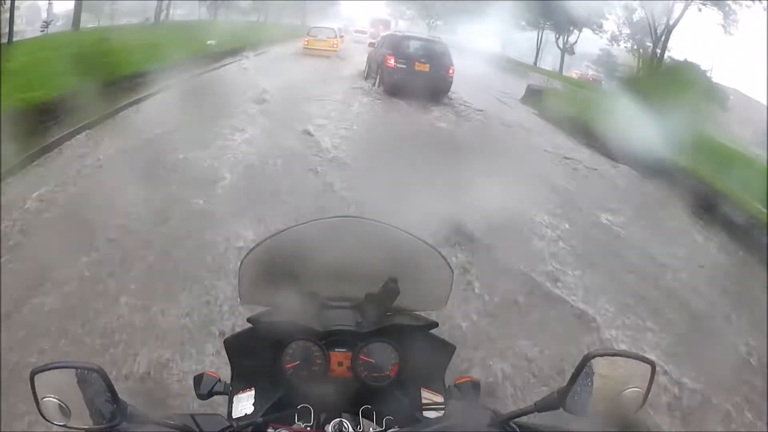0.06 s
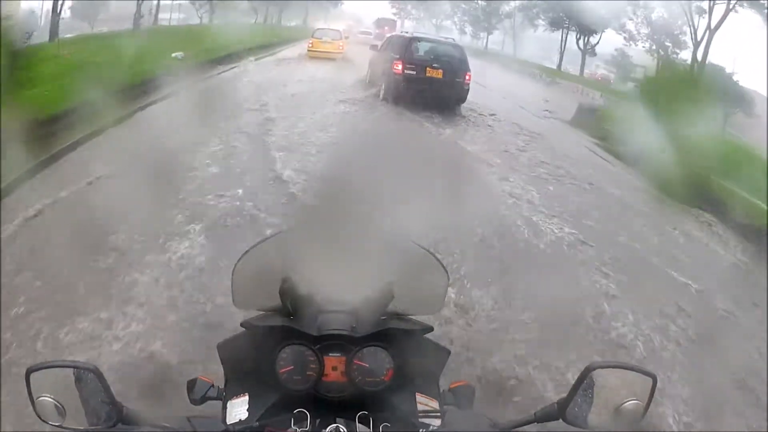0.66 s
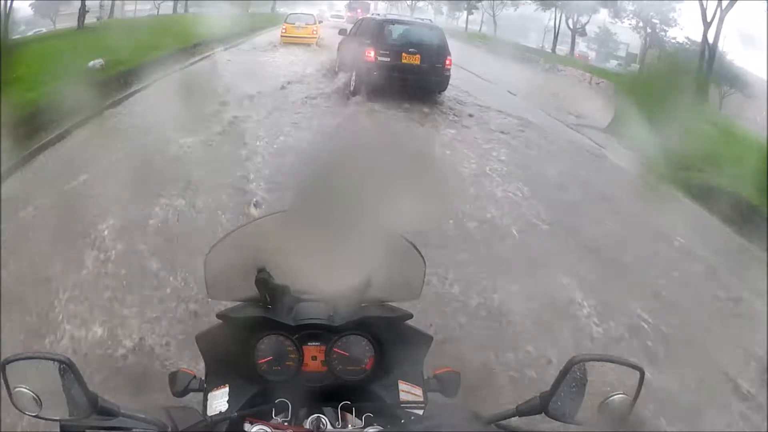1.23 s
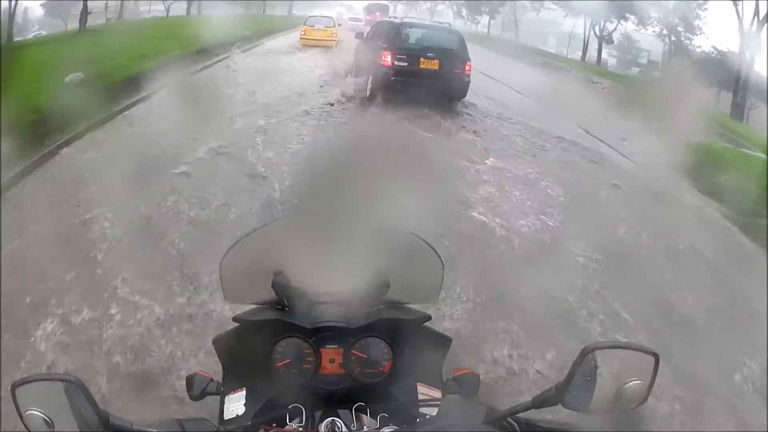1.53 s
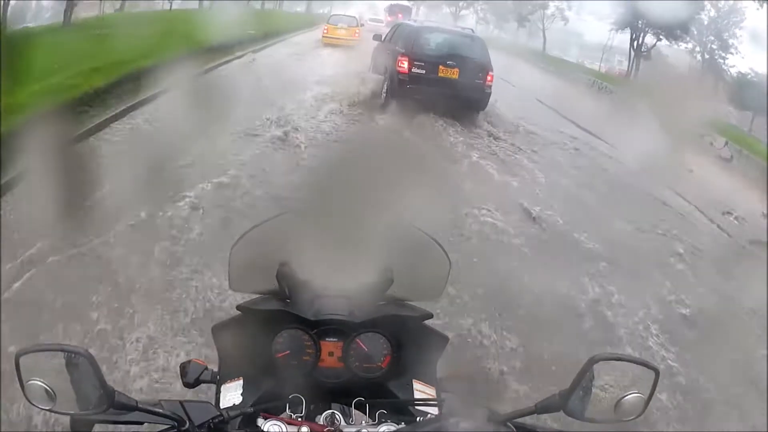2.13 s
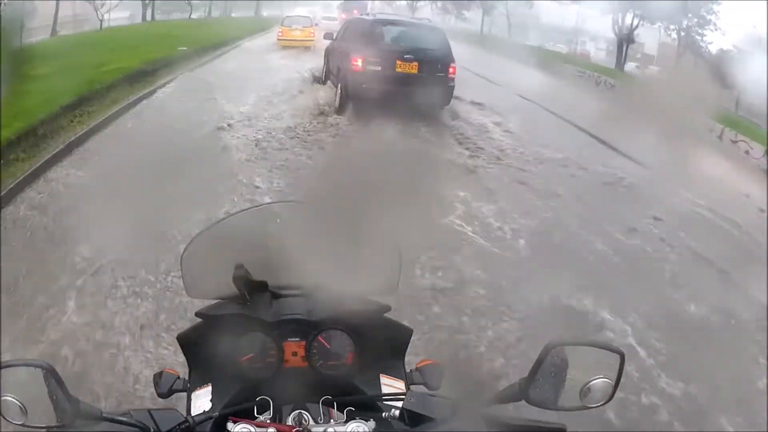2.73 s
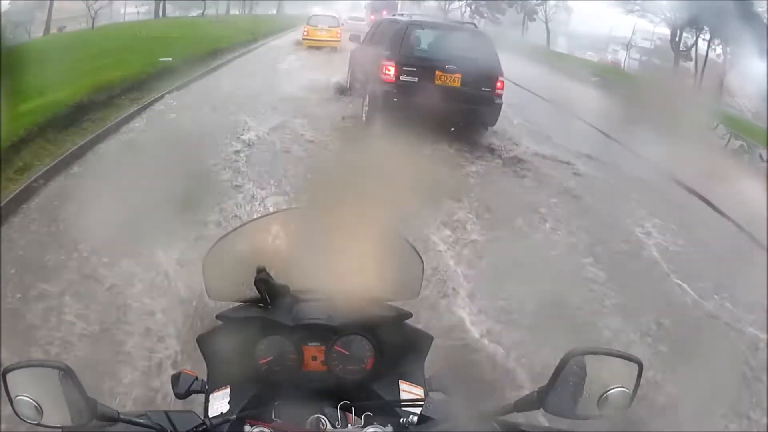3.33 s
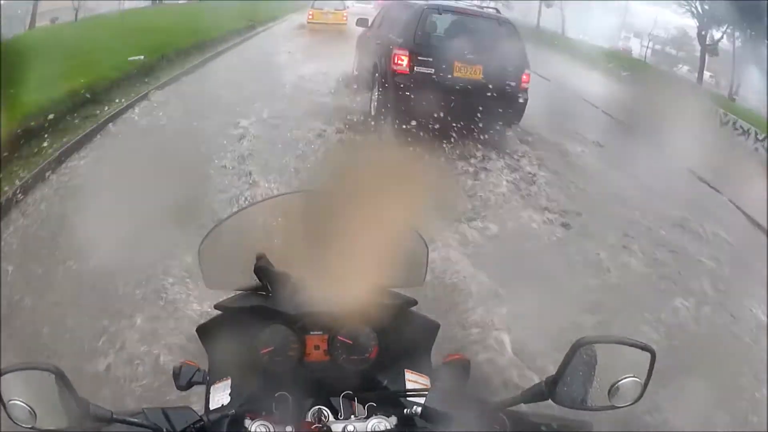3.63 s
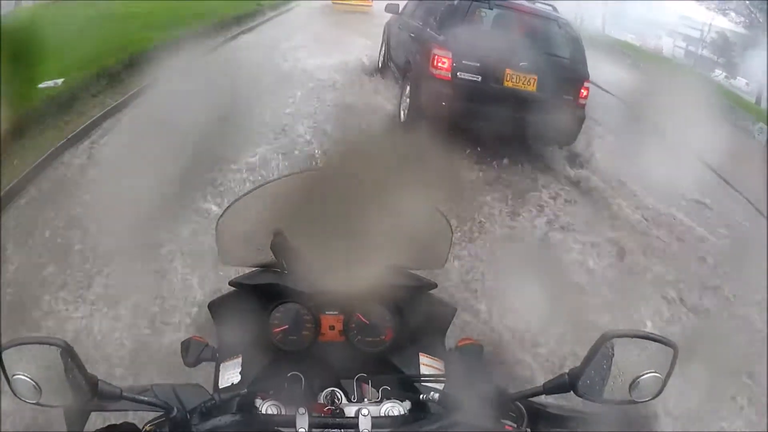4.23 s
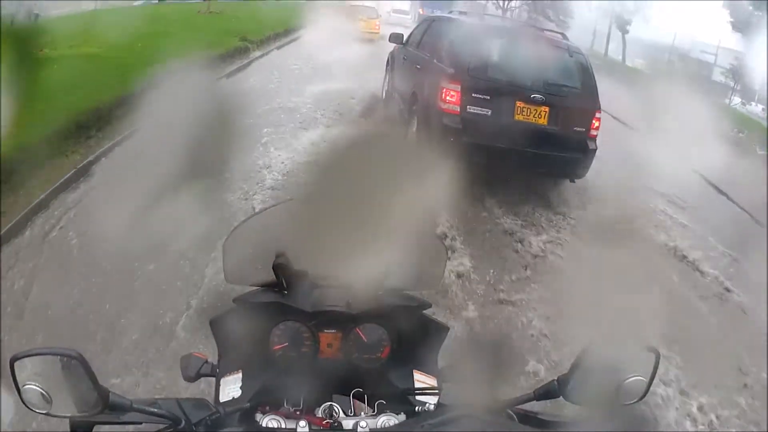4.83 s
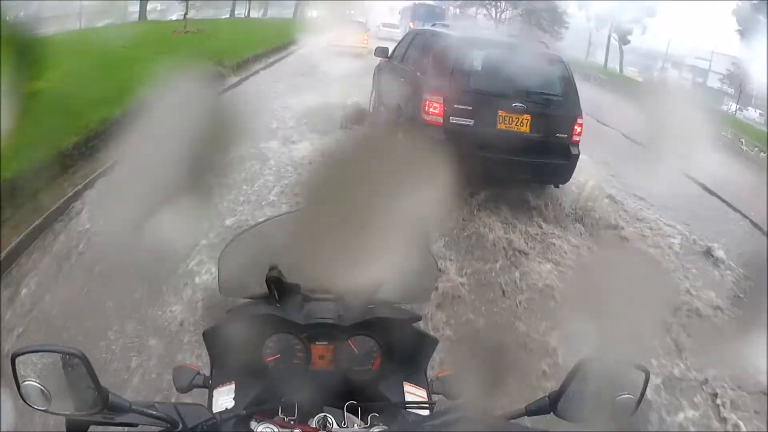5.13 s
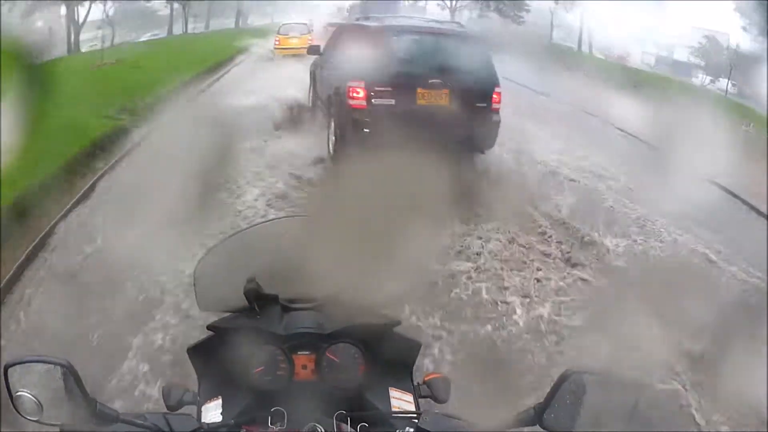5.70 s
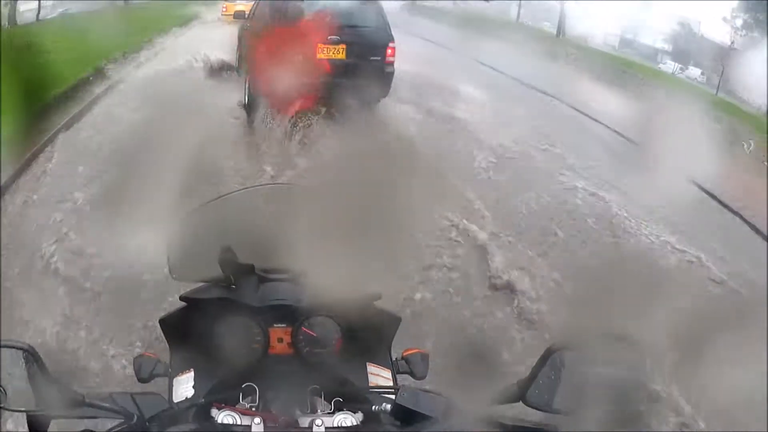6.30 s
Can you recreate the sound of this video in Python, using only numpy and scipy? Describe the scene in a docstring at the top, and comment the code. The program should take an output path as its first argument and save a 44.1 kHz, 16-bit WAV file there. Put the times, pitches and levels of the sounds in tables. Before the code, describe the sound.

Rain and road spray splatter against a moving motorcycle's microphone, with gusty wind rush and a faint engine drone underneath.

```python
"""Motorcycle ride in heavy rain

A rider on a flooded street wears a camera with two microphone holes, the left and right ports.
Wind buffets both, and the engine drones faintly underneath. Spray from the car ahead washes
and patters on the camera's housing, ever thicker. A drop that lands right on a port rings
the film of water there, and a big one overloads that side."""
import sys
import numpy as np
from scipy import signal
from scipy.fft import rfft, irfft
from scipy.io import wavfile

SR = 44100
rng = np.random.default_rng(int(sys.argv[2]) if len(sys.argv) > 2 else 0)


def bounce(signal):
    """Save signal as a 16-bit WAV file at the path given by the first command-line argument."""
    frames = np.transpose(np.atleast_2d(signal))
    limited = np.clip(frames, -1, 1)
    pcm = np.round(limited * 32767).astype(np.int16)
    wavfile.write(sys.argv[1], SR, pcm)


N = 280476
TIME = np.arange(N) / SR
RING_TIME = np.arange(4096) / SR  # seconds since a hit
LUMP_DB, LUMP_HZ = 1.6, 50.  # the spray lands in lumps: how strong, how fast

# Levels are relative. t60 is the time a ring takes to fade by 60 dB.
# rush of air at the ports: f/Hz, left/dB, right/dB
WIND_SPECTRUM = [(22, -107, -27), (56, -26.5, -33), (106, -18, -5.5), (119.7, -6.5, -7.5), (247, -2.5, -5),
                 (350, -3.5, -9), (503, -14.5, -5), (593, -13, -11), (680, -25.5, -15), (1260, -51, -44.5),
                 (2920, -68, -86.5), (9000, -100, -100)]
# strength of the airflow: t/s, left/dB, right/dB
GUST_LEVELS = [(0.0, -12.5, -17.5), (0.55, -15.5, -24.5), (0.799, -16, -24), (1.05, -13, -20.5),
               (1.38, -14.5, -24), (1.462, -15.5, -28), (1.581, -13, -24), (1.679, -21.5, -23.5),
               (2.02, -10, -22), (2.12, -15.5, -21.5), (2.22, -10.5, -24.5), (2.449, -19, -18.5),
               (2.661, -19, -24.5), (2.78, -10, -18.5), (2.88, -18.5, -14), (3.04, -10.5, -15),
               (3.261, -22.5, -14), (3.38, -23, -29), (3.459, -26.5, -16), (3.537, -32.5, -33),
               (3.719, -19.5, -16), (3.919, -13.5, -14.5), (4.099, -22.5, -27.5), (4.322, -13.5, -21),
               (4.78, -23, -26), (5.3, -15, -28), (5.841, -14, -21), (5.92, -15.5, -22), (6.36, -16, -22.5)]
# drops and short, low wind bumps at a port: t/s, port (0 left, 1 right), level/dB, ring f/Hz, t60/s
PORT_HITS = [(0.01, 0, 13.5, 617, 0.0099), (0.065, 1, -11.5, 1095, 0.0038), (0.2017, 1, 1.5, 687, 0.015),
             (0.303, 1, -10.5, 1070, 0.011), (0.482, 1, -1, 705, 0.011), (0.5085, 0, 21.5, 380, 0.0084),
             (0.527, 0, -8, 880, 0.011), (0.5802, 1, 0.5, 970, 0.0057), (0.5876, 0, 20.5, 312, 0.0074),
             (0.6476, 1, 14, 614, 0.016), (0.66, 0, -12, 950, 0.0027), (0.6818, 0, -9, 1000, 0.0025),
             (0.737, 0, 0, 910, 0.0039), (0.8475, 0, 2.5, 430, 0.0073), (1.08, 0, 9.5, 542, 0.021),
             (1.0844, 0, 17.5, 372, 0.012), (1.193, 0, -2, 786, 0.0059), (1.701, 0, -0.5, 326, 0.056),
             (1.791, 1, -7.5, 1100, 0.0064), (1.812, 1, 2, 655, 0.011), (2.068, 0, 1, 905, 0.0017),
             (2.1385, 1, 16, 595, 0.0095), (2.2009, 0, 8.5, 657, 0.008), (2.3829, 1, 20.5, 596, 0.022),
             (2.607, 0, 4.5, 480, 0.011), (2.7463, 0, 4.5, 362, 0.043), (2.9915, 1, 8, 695, 0.0073),
             (3.0088, 0, 3.5, 646, 0.019), (3.039, 0, -5, 760, 0.0081), (3.0568, 0, 4.5, 334, 0.044),
             (3.102, 0, -1, 780, 0.0033), (3.1601, 1, 1.5, 770, 0.0087), (3.2592, 0, 15.5, 600, 0.0096),
             (3.312, 0, 5.5, 820, 0.0057), (3.3468, 0, 21.5, 403, 0.0045), (3.417, 0, 14.5, 523, 0.0056),
             (3.5468, 0, 1, 1010, 0.0022), (3.646, 0, -5.5, 900, 0.0039), (3.7196, 1, 21, 623, 0.011),
             (3.816, 0, -7.5, 890, 0.0027), (3.8904, 0, 2.5, 720, 0.0082), (3.9705, 0, -1.5, 920, 0.0073),
             (3.992, 0, 28.5, 354, 0.0081), (4.0057, 0, 15, 620, 0.0075), (4.0787, 0, 2.5, 604, 0.0083),
             (4.1979, 0, 19.5, 510, 0.0043), (4.478, 0, 14.5, 583, 0.01), (4.6088, 0, 14, 274, 0.023),
             (4.6437, 0, 22, 450, 0.0091), (4.712, 0, 31.5, 353.5, 0.013), (4.7431, 0, 5.5, 380, 0.0076),
             (4.7664, 1, 2.5, 600, 0.022), (4.871, 0, 16.5, 537, 0.011), (4.9823, 0, 25, 454, 0.0068),
             (5.159, 0, 10.5, 280, 0.021), (5.195, 0, 21.5, 309, 0.008), (5.462, 0, -0.5, 840, 0.018),
             (5.5198, 0, 8.5, 730, 0.01), (5.527, 1, 11, 660, 0.015), (5.7458, 0, 19, 290, 0.021),
             (5.7843, 0, 8, 710, 0.012), (6.056, 0, -1.5, 900, 0.0077), (6.086, 0, 13.5, 687, 0.0062),
             (6.225, 0, -3.5, 900, 0.0056), (6.2444, 0, 10, 399, 0.0072), (6.3504, 0, 14, 710, 0.0089)]
# notes of the hollow behind a port: f/Hz, level/dB, t60/s
CAVITY_MODES = [(1205, -18.5, 0.012), (1800, -33, 0.0098), (3050, -38.5, 0.0065), (4500, -33, 0.0032)]
# heavy drops that shove the air in the left port: t/s, level/dB, f/Hz
THUD_HITS = [(0.508, 0, 112), (0.588, -2, 89)]
# flow of spray, thicker as the car ahead comes closer: t/s, level/dB
SPRAY_FLOW = [(0.0, -49), (0.24, -55), (0.3, -44), (0.39, -50.5), (0.95, -49.5), (1.02, -41.5),
              (1.12, -55.5), (1.33, -51.5), (1.8, -45.5), (2.28, -48.5), (2.7, -46.5), (2.98, -42),
              (3.2, -47), (3.38, -46), (3.56, -47.5), (3.88, -40.5), (4.23, -40), (4.5, -39), (4.8, -42),
              (5.67, -38), (5.81, -40.5), (6.36, -35.5)]
# water washing over the housing: f/Hz, left/dB, right/dB
WASH_SPECTRUM = [(310, -28, 13.5), (710, 17.5, -9.5), (940, 2, -3), (1060, 6, -5), (1290, -3, -6.5),
                 (1520, 2, -5.5), (1500, -1, -3.5), (1620, -10, -10), (1880, -5, -11), (2360, -13.5, -16.5),
                 (2970, -15, -27), (3600, -17.5, -25), (4380, -19, -24), (5500, -35.5, -32.5),
                 (11900, -67.5, -62)]
# fine mist on the housing: f/Hz, left/dB, right/dB
MIST_SPECTRUM = [(2500, -10, -15), (3720, -3, 1), (5700, -8, -11), (7200, -2, -3), (8700, -3, -1.5),
                 (10400, -8, -9), (12500, -13.5, -15), (14400, -20, -23), (16000, -36, -38)]
# drops on the housing, from dull taps to bright ticks: t/s, level/dB, brightness/(dB per octave)
TAP_HITS = [(0.176, -20.5, -3), (0.364, -10.5, -5), (0.644, -17, -1), (0.741, -17, 7), (0.778, -25, 2.0),
            (0.887, -27.5, 4), (1.011, -15.5, 1), (1.431, -10.5, 3), (1.678, -20, 5), (1.713, -30, 12),
            (1.874, -23.0, 4.5), (2.045, -19, -1), (2.454, -23, -5.5), (2.505, -22.5, -1),
            (2.516, -22, 3.0), (2.876, -23.5, -18), (2.953, -8.5, 3), (2.972, -4, 0.5), (2.99, -17.0, -4),
            (3.118, -25, 3.0), (3.281, -26, 2.0), (3.378, -17, 3), (3.705, -23, 4), (3.714, -28, -10),
            (4.023, -15, 4), (4.091, -16, 0.5), (4.179, -20, -2), (4.233, -19.5, 6), (4.278, -26, -7),
            (4.445, -25.5, -7), (4.475, -26.0, -2), (4.489, -20.5, 4), (4.564, -15.5, -8), (4.59, -5, -4),
            (4.608, -1, 1), (4.793, -20, 3), (4.845, -21, 4), (5.039, -24.0, 12), (5.064, -19.5, 1),
            (5.149, -19, -12), (5.214, -14, 2), (5.246, -20, 0.0), (5.257, -24.0, -11), (5.288, -24.5, -4),
            (5.336, -25, 12), (5.342, -27, -1), (5.352, -21, -12), (5.474, -27, 2.0), (5.497, -14, 0),
            (5.705, -18, -1), (5.748, -3, 3.5), (5.793, -19, -3), (5.805, -25.0, 9), (5.875, -9, -1.5),
            (5.942, -18.0, 10), (5.958, -33, 5), (5.966, -22, 2), (5.996, -32, 7), (6.011, 1.5, 2.0),
            (6.127, -27, -4.0), (6.183, -28, 16), (6.207, -4.5, 4), (6.302, -15, 10.5), (6.31, -15.5, 5)]
# a drop bursting on the housing: f/Hz, level/dB
SPLAT_SPECTRUM = [(300, -12), (800, -5), (1500, 1), (2200, -1), (3100, -4), (4200, -1), (5500, -10),
                  (7200, -9), (11000, -18), (16000, -34)]
# notes of the housing and its mount: f/Hz, level/dB, t60/s
HOUSING_MODES = [(310, 3, 0.022), (1000, 15.5, 0.032), (1418, 28.5, 0.014), (1800, 2, 0.026),
                 (2570, -7, 0.023), (4180, -73, 0.011)]
# drops that plop on the wet housing: t/s, level/dB, f/Hz
PLOP_HITS = [(1.195, -21, 1500), (1.852, -18, 1470), (2.308, -9, 1425), (2.728, -17, 1470),
             (2.875, -18, 1596), (3.366, -12.5, 1470), (3.662, -10, 1144), (3.745, -14, 1460),
             (4.022, -14, 4200), (4.319, -13, 1390), (4.374, -13.5, 1475), (4.556, -8, 1410),
             (4.817, -14.5, 1400), (4.944, -12, 1440), (5.398, -13, 1160), (5.493, -9.5, 1440),
             (5.668, -7.5, 1440), (5.704, -10, 1130), (5.793, -16, 1915), (5.849, -12.5, 1430),
             (5.85, -19, 2690), (6.17, -10, 1030), (6.188, -12, 1420)]
# notes within a plop: ratio to the main note, level/dB
PLOP_MODES = [(.72, -10), (1, 0), (1.36, -17), (1.9, -21)]
# slow buffeting of the rider: t/s, level/dB
BUFFET_LEVELS = [(0, -38.5), (1.0, -31), (1.3, -25), (1.9, -24), (2.3, -29), (2.9, -27), (3.15, -48)]
# the engine eases off and picks up again: t/s, firings per second, level/dB
ENGINE_RUN = [(0, 40.3, -42.5), (3.5, 24, -31), (4.3, 32.8, -27.5), (4.7, 34, -25), (5.1, 36, -22.5),
              (5.3, 32.6, -18.5), (5.5, 35, -25.5), (5.68, 42, -22), (6.05, 40.5, -27.5), (6.36, 35, -28)]
# tones of the exhaust: multiple of the firing rate, level/dB
EXHAUST_TONES = [(2, -9), (3, -3), (4, -2.5), (6, -3), (7, -10), (8, -27)]


def wind(trims_db=(0., 1.5), flutter_db=3.5, flutter_hz=37., edge_hz=740., brighten=.22):
    """Air swirls at each port; strong gusts hold smaller swirls and sound brighter."""
    out = []
    for air, gust_db, trim_db in zip(noise(WIND_SPECTRUM), curves(GUST_LEVELS), trims_db):
        air = unit_rms(air)
        small_swirls = filtered(air, 1, edge_hz, "high")
        air = air + small_swirls * (gain_of(brighten * (gust_db - gust_db.mean())) - 1)
        out.append(air * gain_of(gust_db + trim_db + flutter_db * wander(flutter_hz)))
    return np.array(out)


def port_ring(port, db, hz, t60, sag_s=.003, slide_s=.005):
    """The note of one hit on a port; it falls if a heavy drop spreads or the water runs off."""
    heaviness = np.clip((db - 12) / 10, 0, 1)
    sag_octaves = (.9, .15)[port] * heaviness * np.exp(-RING_TIME / sag_s)
    runs_off = t60 < .022  # only rings that fade quickly
    slide_octaves = .55 * runs_off * (np.exp(-RING_TIME / slide_s) - .6)
    return ring(hz * 2 ** (slide_octaves + sag_octaves), t60)


def port_hits(push_hz=147., attack_s=.00009, small_db=(-13., -22.5), small_per_s=2.7, top_hz=4400.):
    """Drops and short wind bumps hit one port: a ring, a low push and a knock in the hollow behind."""
    out = np.zeros((2, N))
    knock = gain_of(-57.5) * struck(HOUSING_MODES) + struck(CAVITY_MODES)
    attack = 1 - np.exp(-RING_TIME / attack_s)
    for s, port, db, hz, t60 in PORT_HITS:
        push_db = -5.5 - 39.5 * max(np.log2(600 / hz), 0)  # lower notes get less push
        push = gain_of(push_db) * ring(push_hz, t60=.01)
        blow = port_ring(port, db, hz, t60) + push + knock
        add(out[port], s, gain_of(db) * attack * blow)
    for side, side_db in zip(out, small_db):  # small drops ring the water film at random
        for hz in np.geomspace(380., 850., 5):
            hits = impacts(small_per_s, spread_db=4., most=2.5)
            film = ring(hz, 9 / hz) * (1 - np.exp(-4 * hz * RING_TIME))
            side += gain_of(side_db) * signal.oaconvolve(hits, film)[:N]
    return filtered(out, 4, top_hz)  # the narrow port passes little treble


def thuds(t60=.085):
    """Heavy drops set off a deep, short swing of air pressure in the left port."""
    out = np.zeros((2, N))
    for s, db, hz in THUD_HITS:
        add(out[0], s, gain_of(db) * ring(hz, t60))
    return out


def spray(flow_db, wash_db=1., mist_db=-23.5, hum_db=13., hum_hz=286.6):
    """Water flung by tyres washes and hisses on the housing; its pelting keeps the mount humming."""
    lumps = gain_of(LUMP_DB * wander(LUMP_HZ))
    wash = unit_rms(noise(WASH_SPECTRUM) * lumps) * gain_of(wash_db)
    mist = unit_rms(noise(MIST_SPECTRUM)) * gain_of(mist_db)
    mount = signal.lfilter(*signal.iirpeak(hum_hz, Q=37., fs=SR), rng.standard_normal(N))
    hum = unit_rms(filtered(mount, 2, [170., 420.], "band")) * gain_of(hum_db)
    return (wash + mist + hum * pan(right_db=-11.5)) * gain_of(flow_db)


def patter(flow_db, level_db=6.5, per_pitch_per_s=50., cycles=11.5):
    """Spray lands in clumps of tiny plinks at many pitches, coloured by the housing."""
    out = np.zeros((2, N))
    for hz in np.geomspace(900., 3400., 36):
        plink = unit_rms(ring(hz, cycles / hz) * (1 - np.exp(-RING_TIME * hz / 2)))
        hits = impacts(per_pitch_per_s, spread_db=3.8, most=3)
        for side in out:
            delayed = np.roll(plink, rng.integers(30))
            side += signal.oaconvolve(hits, delayed)[:N] * rng.uniform(.5, 1)
    clumps = gain_of(LUMP_DB * wander(LUMP_HZ))
    out = signal.oaconvolve(out, click(WASH_SPECTRUM), axes=1)[:, :N] * clumps
    return unit_rms(out) * gain_of(flow_db + level_db)


def splat(brightness_db=0., pivot_hz=4500):
    """A drop flattens within a millisecond and scatters droplets for a few more."""
    size = len(RING_TIME)
    burst = noise_burst(swell_s=rng.uniform(.0002, .0007))
    burst /= np.linalg.norm(burst, axis=1, keepdims=True)
    spectrum = rfft(burst, 2 * size) * rfft(click(SPLAT_SPECTRUM), 2 * size)
    octaves = np.clip(np.log2((np.fft.rfftfreq(2 * size, 1 / SR) + 1) / pivot_hz), -1, 1)
    return irfft(spectrum * gain_of(brightness_db * octaves))[:, :size]


def housing_taps(flow_db, tick_db=1.5, body_db=-33.5, small_db=-22., small_per_s=2.2):
    """Drops tick on the housing, and duller ones ring it more; small ones tap at random."""
    out = np.zeros((2, N))
    body = struck(HOUSING_MODES) * pan(right_db=-10.)
    sides = pan(right_db=-3.)
    for s, db, brightness_db in TAP_HITS:
        tick = splat(brightness_db) * sides * gain_of(tick_db + db)
        add(out, s, tick + body * gain_of(body_db + .79 * (db - brightness_db)))
    strength = sides * gain_of(small_db + .78 * (flow_db - flow_db.mean()))
    for top_hz in np.geomspace(1500, 7000, 10):
        tap = filtered(splat(), 2, top_hz) * rng.uniform(.2, 1, (2, 1))
        hits = impacts(small_per_s, spread_db=6.5, most=3)
        out += strength * 2000 / top_hz * signal.oaconvolve(hits[None], tap, axes=1)[:, :N]
    return out


def plop(hz, cycles=23.3):
    """One hollow note that swells over its first cycle and soon dies away."""
    notes = sum(gain_of(db) * ring(hz * ratio, cycles / hz) for ratio, db in PLOP_MODES)
    return 2 * notes * (1 - np.exp(-RING_TIME * hz))


def plops(flow_db, small_db=6., small_per_s=6.):
    """Drops plop on the wet housing; the spray adds small ones at random."""
    out = np.zeros((2, N))
    for hz in np.geomspace(1352., 1583., 10):
        hits = impacts(small_per_s, spread_db=4., most=2)
        for side in out:
            side += signal.oaconvolve(hits, plop(hz * rng.uniform(.95, 1.05)))[:N]
    out = unit_rms(out) * gain_of(flow_db + small_db)
    for s, db, hz in PLOP_HITS:
        add(out, s, plop(hz) * gain_of(db))
    return out * pan(right_db=-10.)


def droplets(flow_db, level_db=-20., per_band_per_s=4.):
    """Fine droplets make soft, high spits that grow louder with the spray."""
    out = np.zeros((2, N))
    for _ in range(12):
        hits = impacts(per_band_per_s, spread_db=3., most=3)
        burst = noise_burst(swell_s=rng.uniform(.0005, .0016))
        band_hz = rng.uniform(3500, 9000) * np.array([.7, 1.3])
        fizz = filtered(burst, 1, band_hz, "band")
        spit = signal.fftconvolve(fizz, click(MIST_SPECTRUM), axes=1)[:, :len(RING_TIME)]
        spit = spit / abs(spit).max() * rng.uniform(.2, 1, (2, 1))
        out += signal.oaconvolve(hits[None], spit, axes=1)[:, :N]
    return unit_rms(out) * gain_of(flow_db + level_db)


def buffet(band_hz=(42.3, 108.)):
    """Large swirls of air behind the windscreen make a deep rumble."""
    rumble = unit_rms(filtered(rng.standard_normal((2, N)), 2, band_hz, "band"))
    return rumble * gain_of(curves(BUFFET_LEVELS)) * pan(right_db=-17.)


def engine():
    """The exhaust drones faintly under the wind, its firings uneven in pace and strength."""
    rate, level_db = curves(ENGINE_RUN)
    firings = np.cumsum(rate * (1 + .025 * wander(14.))) / SR
    drone = np.zeros(N)
    for multiple, db in EXHAUST_TONES:
        tone = np.sin(2 * np.pi * (multiple * firings + rng.random()))
        drone += gain_of(db) * tone * (1 + .45 * wander(10))
    return unit_rms(drone) * gain_of(level_db) * pan(right_db=-5)


def ring(hz, t60):
    """One fading note, at a steady or gliding pitch."""
    turns = np.cumsum(hz * np.ones(len(RING_TIME))) / SR
    return np.sin(2 * np.pi * turns) * 1000 ** (-RING_TIME / max(t60, .001))


def struck(modes):
    """One blow rings all of an object's own notes, its modes."""
    return sum(gain_of(db) * ring(hz, t60) for hz, db, t60 in modes)


def click(table):
    """The shortest pulse with this spectrum that makes no sound before its start; peak 1."""
    log_gain = np.log(colour(table, abs(np.fft.fftfreq(len(RING_TIME), 1 / SR))))
    pulse = np.fft.ifft(np.exp(np.conj(signal.hilbert(log_gain)))).real
    return pulse / abs(pulse).max()


def impacts(per_s, spread_db, most):
    """Random hits, many small and a few large, spanning up to most * spread_db decibels."""
    size = gain_of(spread_db * np.minimum(rng.exponential(1, N), most))
    return size * rng.choice([-1, 1], N) * (rng.random(N) < per_s / SR)


def noise_burst(swell_s):
    """A puff of noise at each port that swells, then fades."""
    return RING_TIME * np.exp(-RING_TIME / swell_s) * rng.standard_normal((2, len(RING_TIME)))


def noise(table):
    """Noise with this spectrum, unrelated between the ports."""
    return irfft(rfft(rng.standard_normal((2, N))) * colour(table, np.fft.rfftfreq(N, 1 / SR)), N)


def wander(rate_hz):
    """A smooth random wobble, mostly slower than rate_hz."""
    hz = np.fft.rfftfreq(N, 1 / SR)
    return unit_rms(irfft(rfft(rng.standard_normal(N)) / (1 + (hz / rate_hz) ** 4), N))


def colour(table, hz):
    """The gains a spectrum table gives at these frequencies."""
    f, *sides = np.transpose(table)
    return gain_of([np.interp(np.log(hz + 1), np.log(f), side) for side in sides])


def curves(table):
    """Joins each column's points with straight lines in time."""
    s, *columns = np.transpose(table)
    return np.array([np.interp(TIME, s, column) for column in columns])


def filtered(sound, order, hz, kind="low"):
    """Keeps the lows, the highs or a band; a higher order cuts more steeply."""
    return signal.sosfilt(signal.butter(order, hz, kind, fs=SR, output="sos"), sound)


def add(mix, s, sound):
    """Mixes a sound in, s seconds from the start."""
    part = mix[..., max(0, round(s * SR)):][..., :sound.shape[-1]]
    part += sound[..., :part.shape[-1]]


def gain_of(db):
    """Turns decibels into a multiplier."""
    return 10 ** (np.asarray(db) / 20)


def pan(right_db):
    """Left and right gains that change only the right side."""
    return gain_of([[0], [right_db]])


def unit_rms(x):
    """Scales a signal to a typical size (rms) of 1."""
    return x / np.sqrt(np.mean(x ** 2) + 1e-20)


def scene(surge_db=2.5, surge_hz=23):
    """Wind, engine, surging spray and drops at the two ports."""
    air = wind() + buffet() + engine()
    flow_db = curves(SPRAY_FLOW)[0] + surge_db * wander(surge_hz)
    water = spray(flow_db) + patter(flow_db) + droplets(flow_db) + plops(flow_db)
    return air + water + housing_taps(flow_db) + port_hits() + thuds()


def record(dry, ceiling=.86, soft_hz=9300., low_cut_hz=24., top_hz=16400):
    """Overload flattens the peaks; filters soften the treble and cut the lowest and highest tones."""
    softened = filtered(np.clip(dry, -ceiling, ceiling), 1, soft_hz)
    trimmed = filtered(softened, 1, low_cut_hz, "high")
    low_pass = signal.firwin(255, top_hz, window=("kaiser", 8), fs=SR)
    return signal.oaconvolve(trimmed, low_pass[None], "same", axes=1)


dry = scene()
out = record(dry)
bounce(out)
```